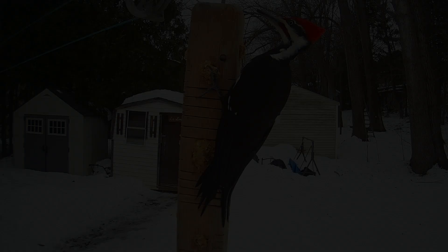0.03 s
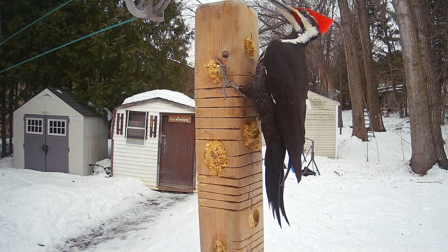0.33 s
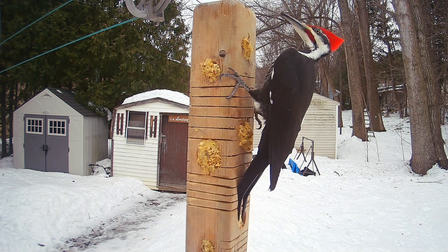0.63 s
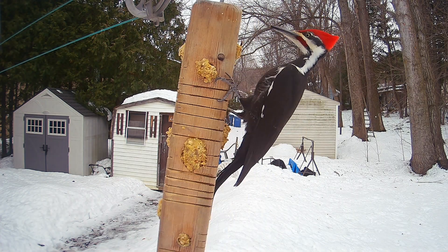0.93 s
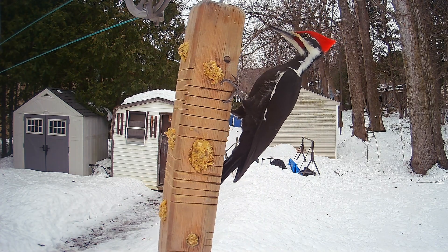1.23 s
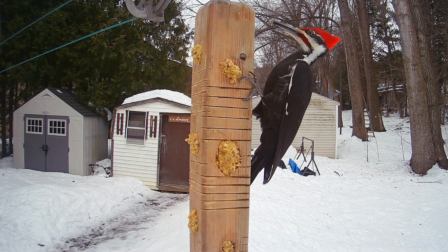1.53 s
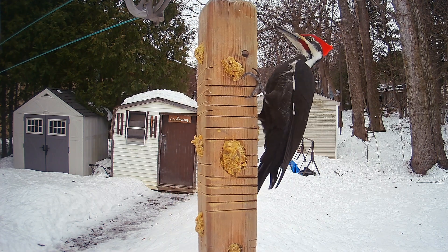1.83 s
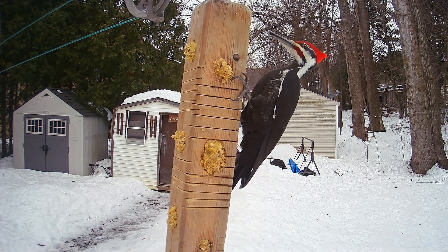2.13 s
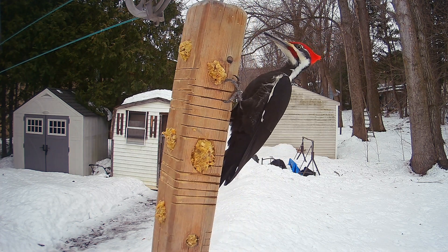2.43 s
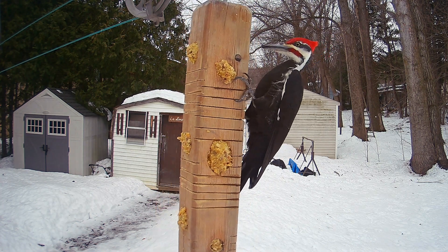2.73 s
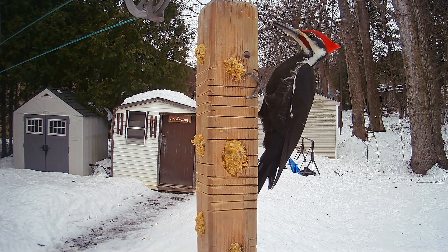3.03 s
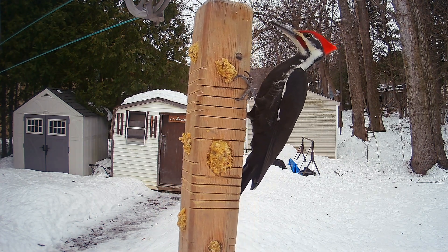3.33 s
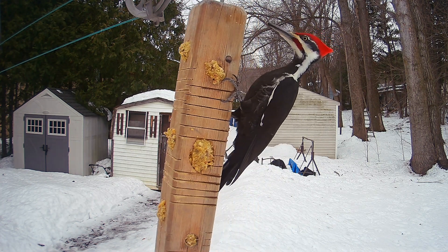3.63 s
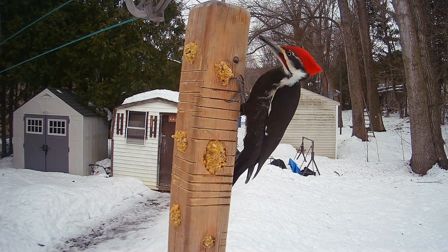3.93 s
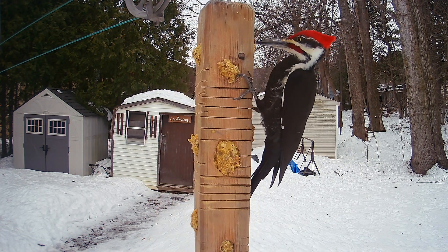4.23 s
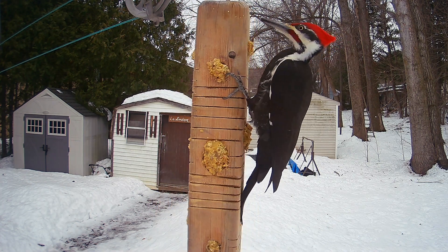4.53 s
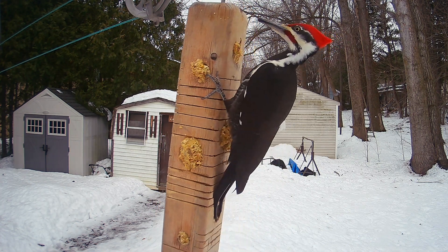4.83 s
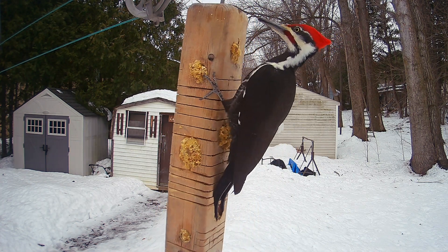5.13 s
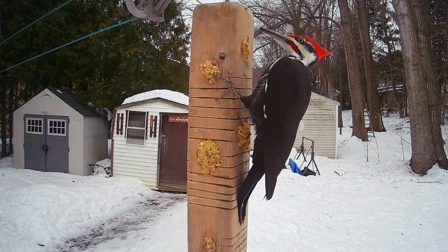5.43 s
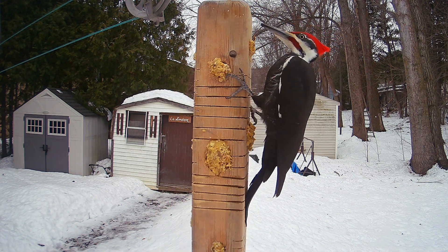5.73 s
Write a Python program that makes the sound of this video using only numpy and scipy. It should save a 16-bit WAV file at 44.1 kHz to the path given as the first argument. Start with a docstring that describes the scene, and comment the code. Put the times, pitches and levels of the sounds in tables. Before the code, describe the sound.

A large woodpecker repeats short, loud cackling calls close by outdoors, over faint wind rumble and soft hiss.

```python
"""A small camera wakes in a snowy yard and catches the end of a large woodpecker's first 'wuk'.
The bird, on a feeder post right in front, keeps calling about four times a second. Each short cry
swells with its breath, arches in pitch and collapses; then the house, sheds and trees answer it.
Claws scrape the post early on and now and then later. Wind rumbles on the microphone, most near the end.
All along the air hisses softly, and the camera's slow sampling mirrors the sound into the top octave."""
import sys
import numpy as np
from scipy import signal
from scipy.fft import rfft, irfft, next_fast_len
from scipy.io import wavfile
from scipy.ndimage import uniform_filter1d

SR = 44100
rng = np.random.default_rng(int(sys.argv[2]) if len(sys.argv) > 2 else 0)


def to_wav(sig):
    """Store sig (one row per channel, or 1-D mono) as 16-bit WAV at the path in sys.argv[1].

    Samples outside -1..1 are clipped; the rate is SR.
    """
    pcm = np.clip(np.atleast_2d(sig), -1, 1) * 32767
    pcm = np.round(pcm).astype(np.int16)
    wavfile.write(sys.argv[1], SR, pcm.T)  # frames by channels


N = 254898
TIME = np.arange(N) / SR
CAMERA_HZ = 16000  # how often the camera samples the sound
LEAD_SHARE = .08  # a cry begins this share of its length early, so it can fade in


def woodpecker():
    """The bird calls again and again, each cry a little different."""
    # one row a cry: (time [s], length [s], top pitch [Hz], place of the top [0-1], level [dB],
    # boost of harmonics 1 and 3 [dB], brightness [dB])
    notes = [(0.016, 0.049, 963.5, 0.39, -23.5, 1.5, 4.5), (0.213, 0.052, 981, 0.37, -20.5, 3, 5),
             (0.4079, 0.049, 991, 0.34, -15, -3.5, 3.5), (0.605, .047, 947, .37, -17, -2.5, 4),
             (0.8215, 0.045, 936, .36, -23.5, -0.5, 3.5), (1.097, 0.045, 932, 0.39, -23.5, -0.5, 0.5),
             (1.421, 0.043, 943, 0.4, -25.5, -1, 1), (1.6587, 0.047, 977, .38, -26, -1, 2.5),
             (1.9486, 0.046, 964.5, 0.35, -23, -2.5, -1.5), (2.1867, 0.044, 958, 0.29, -27.5, -2.5, 2),
             (2.418, .042, 910.5, 0.35, -30.5, -1.5, 5), (2.6472, 0.041, 926, 0.47, -24.5, -3.5, -1),
             (3.043, 0.044, 967, 0.4, -28.5, -1.5, -1.5), (3.3203, 0.041, 962, 0.3, -25, 0.5, -2),
             (3.6345, .046, 950.4, 0.3, -28.5, 1, 3.5), (3.8899, 0.04, 969, 0.4, -22.5, 4.5, 4),
             (4.1234, 0.041, 972.5, 0.51, -23, 5.5, 1), (4.59, 0.038, 983.5, 0.49, -20, 5, -1),
             (4.851, .038, 949.6, 0.36, -24, 3, 1), (5.1175, .043, 963, 0.34, -23.5, 5.5, 4.5),
             (5.3512, .040, 997.7, 0.48, -17, 0.5, 1.5), (5.597, 0.048, 958.4, 0.58, -19.5, 0, -3)]
    out = np.zeros(N)
    for start, length, *shape in notes:
        add(out, start - LEAD_SHARE * length, cry(length, *shape))
    return out


def cry(length, top_hz, crest, db, odd_db, bright_db, ordinary_db=-23, turn=.73, effort_tilt=.45):
    """One 'wuk': a tone with harmonics (multiples of its pitch); the voice box turns rough as it lets go."""
    # how the throat and open bill favour some pitches: (frequency [Hz], gain [dB])
    throat = [(650, -19), (1000, -10), (1550, 0), (1950, 0), (2450, -12), (2800, -16), (3300, -16),
              (3750, -11), (4250, -17), (4750, -21), (5200, -24), (5900, -12), (6500, -19), (7600, -32)]
    progress = np.arange(-LEAD_SHARE, 1.35, 1 / (length * SR))  # 0 to 1 is the cry, then comes its tail
    size = len(progress)
    release = np.clip((progress - .8) / .1, 0, 1)
    jitter = (.003 + .014 * release ** 2) * wander(1500, size)
    hz = pitch_arch(progress, length, top_hz, crest) * (1 + jitter)
    phase = 2 * np.pi * np.cumsum(hz) / SR
    effort_db = breath(progress)
    push_db = db - ordinary_db
    # from the turn on, membranes slap shut: the middle harmonics dip, then the high ones flare
    press = np.clip((progress - turn) / .16, 0, 1)
    harmonics = []
    for k in range(1, 10):
        dip = np.exp(-((progress - turn - .02 * rng.standard_normal()) / .048) ** 2)
        closing_db = 3.5 * np.log(k / 2) * press - 10 * dip * (k in (4, 5, 6))
        # the moving bill shifts the upper harmonics differently in every cry
        bill_db = 3.8 * (k > 2) * wander(70, size)
        flutter_db = .6 * wander(400, size)
        # the harder the bird presses, the stronger the harmonics above the third
        octaves_up = max(np.log2(k / 3), 0)
        tilt_db = effort_tilt * octaves_up * (np.maximum(effort_db, -5.75) + push_db)
        gain = undb(effort_db + closing_db + bill_db + flutter_db + tilt_db)
        harmonics.append(gain * response(throat, k * hz) * np.sin(k * phase + k * k))
    # balance harmonics 1 to 4 and the rest; louder cries move energy from the fourth to those above
    groups = harmonics[:4] + [sum(harmonics[4:])]
    fourth_db = -12 + bright_db / 2 - .93 * max(push_db, 0)
    upper_db = -18 + bright_db + .27 * push_db
    gains = undb([-12.5 + odd_db, 0, -16.5 + odd_db, fourth_db, upper_db])
    tone = sum(gain * unit(group) for gain, group in zip(gains, groups))
    # air escapes once a cycle, most in the loudest and brightest cries
    puffs = rng.standard_normal(size) * (1 + np.cos(phase))
    air = colour(puffs, [(1200, -18.5), (2400, -5.5), (4500, -3.5), (6500, -8.5), (8000, -1)])
    rasp = unit(air * undb(effort_db + 10 * press)) * undb(-39 + bright_db + 1.3 * push_db)
    return undb(db) * (tone + rasp) * np.sqrt(length * SR / size)


def pitch_arch(progress, length, top_hz, crest, usual_length_s=.044, sag_hz_per_s=6470, bend=1.8):
    """The pitch scoops up (long cries from further below), sags, then slumps as the breath goes."""
    before_top = np.maximum(1 - progress / crest, 0)
    after_top = np.clip((progress - crest) / (1 - crest), 0, 1)
    scoop_hz = 174.6 * (length / usual_length_s) ** 2.3 * before_top ** bend
    sag_hz = sag_hz_per_s * length * (1 - crest) * after_top ** bend
    slump = np.exp(-2.3 * np.maximum(progress - .95, 0))
    return (top_hz - scoop_hz - sag_hz) * slump


def breath(progress, peak_at=.73, cut_at=.95, swell_db=11.5, ease_db=5):
    """Breath pressure in dB: it starts fast, swells, eases, cuts off and leaves a weak fading tail."""
    rise_db = swell_db * np.minimum(progress / peak_at - 1, 0)
    fall_db = ease_db * np.clip((progress - peak_at) / (1 - peak_at), 0, 1)
    opens = 1 / (1 + np.exp(-progress / .015))
    shuts = 1 / (1 + np.exp((progress - cut_at) / .014))
    tail = undb(-17 - 61 * np.maximum(progress - cut_at, 0))
    return rise_db - fall_db + 20 * np.log10(opens * np.maximum(shuts, tail))


def claws(grain_db=5):
    """Claws catch on wood fibres: brief bursts of uneven, bright grains."""
    # scrapes on the post: (time [s], a quarter of the length [s], level before halving [dB])
    scrapes = [(0.149, 0.0024, -58), (0.312, 0.012, -49), (0.336, .006, -43), (0.347, 0.014, -42.5),
               (0.378, 0.0038, -44.5), (0.568, 0.005, -47.5), (1.784, 0.0019, -58), (1.818, .005, -61),
               (1.857, 0.00098, -60.5), (4.083, .005, -62), (5.178, 0.01, -53), (5.284, 0.004, -57)]
    tone = [(300, -6), (1200, -7), (3000, 2), (4800, -.5), (6500, 3), (8000, -7.5), (9000, -28)]
    out = np.zeros(N)
    for start, quarter_s, db in scrapes:
        age = np.arange(int(4 * quarter_s * SR)) / (quarter_s * SR)
        grains = rng.standard_normal(len(age)) * undb(grain_db * wander(1200, len(age)))
        burst = colour(grains * age * np.exp(-2 * age), tone)
        add(out, start, undb(db) / 2 * unit(burst))
    return out


def yard(sound, post_fade_s=.045, near_fade_s=.27, trees_fade_s=1.5):
    """Walls echo; the post adds a bright splash, nearby things a short scatter, trees a faint long wash."""
    # bounces off the house and sheds: (delay [s], gain before filtering [dB])
    echoes = [(.0095, -12), (0.032, -30.5), (0.0469, -19), (0.084, -34.5)]
    t = np.arange(SR) / SR
    walls = np.zeros(N)
    for delay, db in echoes:
        add(walls, delay, undb([db]))
    walls = colour(walls[:SR], [(500, -3), (1000, -3), (1900, -2), (2800, -8), (3700, -9), (7000, -16)])
    # many tiny echoes blur into noise that drops 60 dB in its fade time
    post = rng.standard_normal(SR) * undb(-60 * t / post_fade_s) * (t > .002)
    post = colour(unit(post), [(1500, -13), (3000, 2.5), (5000, 7), (8000, 6)])
    near = rng.standard_normal(SR) * undb(-60 * t / near_fade_s) * (t > .003)
    near = colour(unit(near), [(500, -8.5), (1900, 10), (4000, 9), (6000, 11.5), (8000, 5)])
    trees = rng.standard_normal(SR) * undb(-60 * t / trees_fade_s) * np.minimum(t / .06, 1)
    trees = colour(unit(trees), [(500, 5), (1900, -1.5), (4000, .5), (7000, 0)])
    scatter = (undb(-24) * post + undb(-31) * near + undb(-35.5) * trees) / np.sqrt(SR)
    return signal.fftconvolve(sound, walls + scatter)[:N]


def wind(breeze_db=-50, calm_hz=48.3, rumble_hz=42):
    """Wind rumbles on the microphone: stronger gusts shed smaller, higher swirls over a bed of slow ones."""
    # wind strength at the microphone: (time [s], level [dB])
    strengths = [(.05, -67), (.5, -55), (.75, -71.5), (1.18, -59.5), (1.36, -78.5), (2.4, -90.5),
                 (2.74, -66.5), (2.93, -89.5), (3.35, -72), (3.56, -79), (3.7, -55), (4.3, -51.5),
                 (4.6, -37.5), (4.76, -52), (4.86, -41.5), (5.18, -40.5), (5.34, -52.5), (5.78, -57)]
    # short blows of air: (time [s], length [s], level [dB], swirl pitch [Hz])
    buffets = [(0.436, .13, -44.5, 137.8), (1.209, 0.053, -52.5, 71.6), (1.459, 0.048, -56, 75.2),
               (1.691, .025, -51.5, 100), (1.88, 0.035, -53.5, 90), (3.18, .113, -43.5, 96.4),
               (4.59, .055, -30.5, 243.6), (5.68, 0.023, -42, 161)]
    strength_db = curve(strengths, TIME)
    above_breeze_db = strength_db - breeze_db
    gust_hz = calm_hz + 87 * undb(above_breeze_db) ** .34
    out = swirls(strength_db + 3 * wander(30), gust_hz)
    out += swirls(-64 + .65 * above_breeze_db, np.full(N, rumble_hz), per_second=200)
    for start, length, db, swirl_hz in buffets:
        size = int(length * SR)
        puff = swirls(np.zeros(size), np.full(size, swirl_hz))
        add(out, start, undb(db) * unit(puff * signal.windows.tukey(size, .2)))
    return out


def swirls(strength_db, hz, per_second=900, spread_db=1.5, pitch_spread=.23):
    """Separate swirls of air, each a dip in pressure between two rises; small swirls are quicker."""
    out = np.zeros(N)
    count = int(per_second * len(hz) / SR) + 1
    centres = rng.integers(0, len(hz), count)
    for i, (smallness, force) in zip(centres, rng.standard_normal((count, 2))):
        pitch = hz[i] * np.exp(pitch_spread * smallness)
        angle = np.arange(-4, 4, 2 * np.pi * pitch / SR)
        pressure = (angle ** 2 - 1) * np.exp(-angle ** 2 / 2)
        swirl = unit(pressure) * np.sqrt(SR / per_second / len(angle))
        add(out, (i - len(angle) / 2) / SR, swirl * undb(strength_db[i] + spread_db * force))
    return out[:len(hz)]


def hiss(waver_db=.8):
    """Winter air and trees make a soft, slowly changing hiss."""
    # how loud the hiss is: (time [s], level [dB])
    levels = [(.05, -64), (.45, -56), (.85, -66), (2.1, -69), (2.98, -74), (3.24, -61), (3.5, -71),
              (3.85, -63.5), (4.7, -63.5), (5.2, -58.5), (5.78, -63.5)]
    # the tone of the hiss: (frequency [Hz], gain [dB])
    tone = [(200, 3.5), (700, 12), (1300, 2.5), (2500, -2), (4000, -1.5), (5000, -2.5), (6300, -10.5),
            (7800, -4.5)]
    air = unit(cut_above(colour(rng.standard_normal(N), tone), CAMERA_HZ / 2))
    return air * undb(curve(levels, TIME) + waver_db * wander(10))


def undb(db):
    """Turn decibels into a number to multiply by."""
    return 10 ** (np.asarray(db) / 20)


def unit(x):
    """Scale a sound to an average (rms) size of 1."""
    return x / np.sqrt(np.mean(x ** 2) + 1e-20)


def curve(table, at):
    """Join the rows of a table by straight lines."""
    return np.interp(at, *np.transpose(table))


def response(table, hz):
    """Look up the multiplier for a pitch in a (frequency [Hz], gain [dB]) table."""
    points, db = np.transpose(table)
    return undb(np.interp(np.log(hz + 1), np.log(points), db))


def colour(x, table):
    """Change a sound's tone by a (frequency [Hz], gain [dB]) table."""
    size = next_fast_len(2 * len(x))
    hz = np.arange(size // 2 + 1) * SR / size
    return irfft(rfft(x, size) * response(table, hz), size)[:len(x)]


def cut_above(x, hz):
    """Sharply remove everything above a frequency."""
    return signal.sosfilt(signal.ellip(10, .2, 70, hz, fs=SR, output="sos"), x)


def wander(per_second, size=N):
    """Drift smoothly between random values, mostly within -1 to 1."""
    hold = max(int(SR / per_second), 1)
    steps = np.repeat(rng.standard_normal(size // hold + 1), hold)
    return uniform_filter1d(steps, hold)[:size]


def add(track, start, sound):
    """Mix a sound into a track at a time in seconds."""
    i = max(int(start * SR), 0)
    track[i:i + len(sound)] += sound[:N - i]


def scene():
    """The bird and its echoes in the yard, with wind and hiss."""
    bird = woodpecker() + claws()
    return (bird + yard(bird) + wind() + hiss())[None]


def record(dry, wake_s=.05, faint_hiss_db=-73, top_hz=16300):
    """The camera wakes just after the start; its slow sampling adds a faint mirror image in the treble."""
    # strength of the image above half the camera's sampling rate: (frequency [Hz], gain [dB])
    mirror = [(8000, 1), (8900, -3.5), (9500, -13), (11000, -11), (12500, -17.5), (14200, -22),
              (15000, -26), (15800, -30)]
    awake = np.clip((TIME - wake_s) / .026, 0, 1)
    sound = cut_above(dry[0] * awake, CAMERA_HZ / 2)
    image = cut_above(2 * sound * np.cos(2 * np.pi * CAMERA_HZ * TIME), CAMERA_HZ)
    faint_hiss = undb(faint_hiss_db) * awake * rng.standard_normal(N)  # even, reaches the top octave
    return cut_above(sound + colour(image, mirror) + faint_hiss, top_hz)[None]


dry = scene()
out = record(dry)
to_wav(out)
```